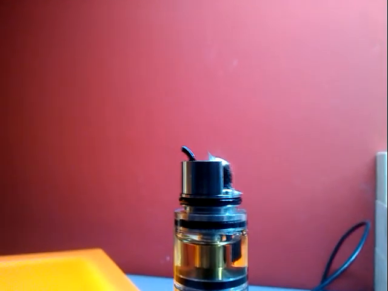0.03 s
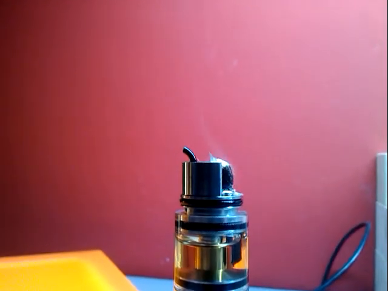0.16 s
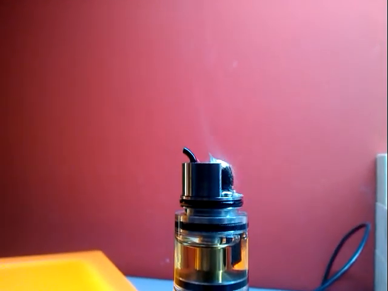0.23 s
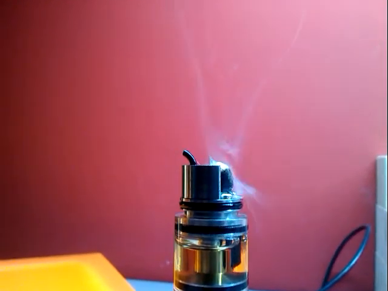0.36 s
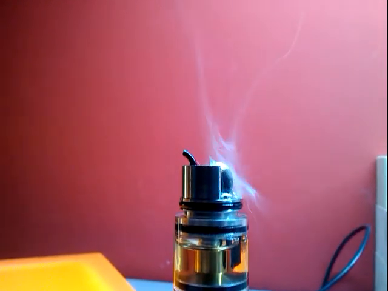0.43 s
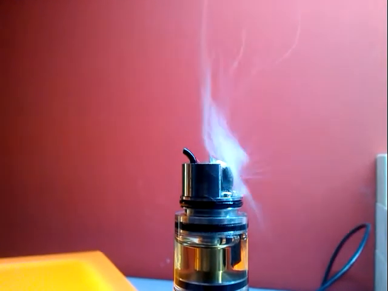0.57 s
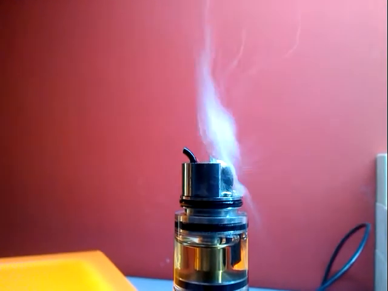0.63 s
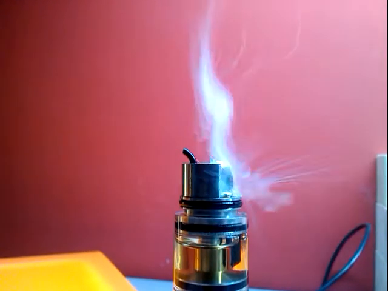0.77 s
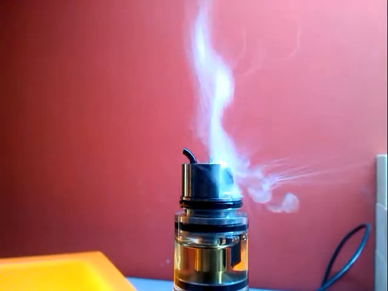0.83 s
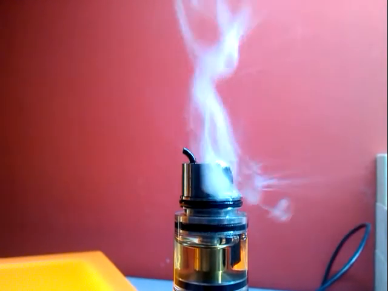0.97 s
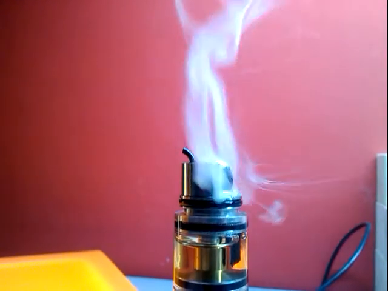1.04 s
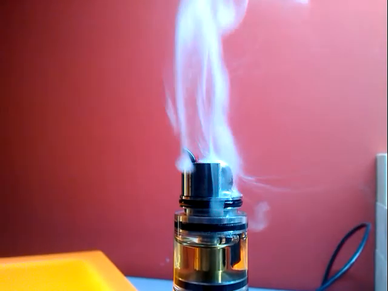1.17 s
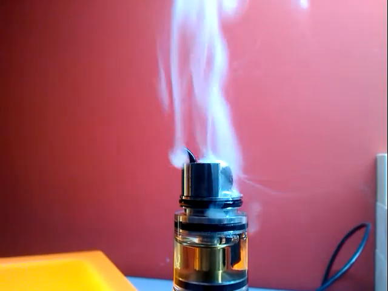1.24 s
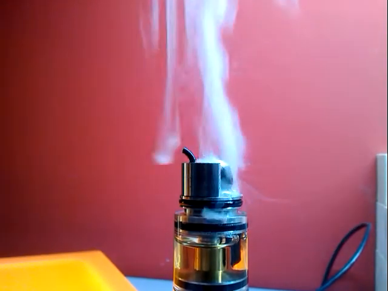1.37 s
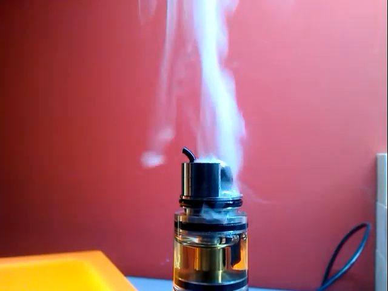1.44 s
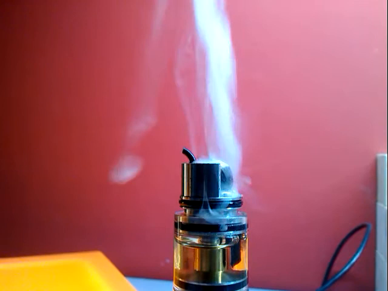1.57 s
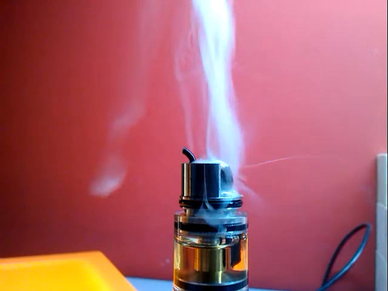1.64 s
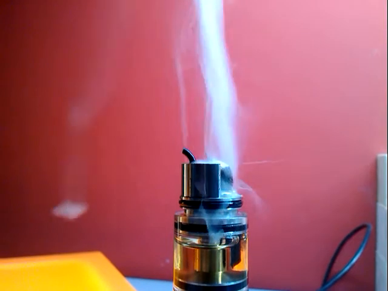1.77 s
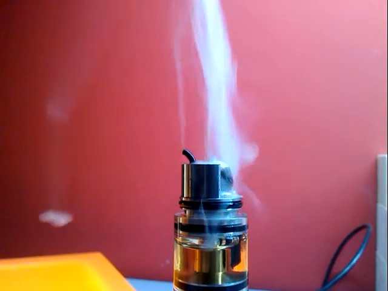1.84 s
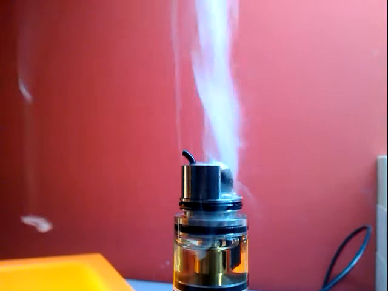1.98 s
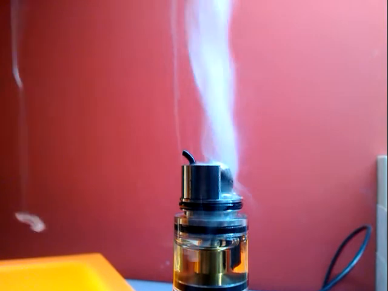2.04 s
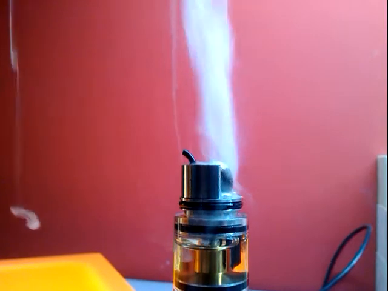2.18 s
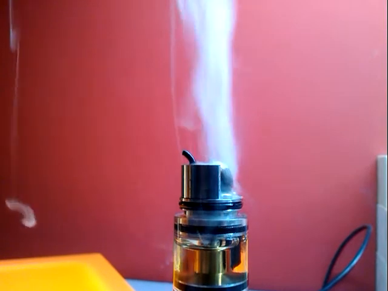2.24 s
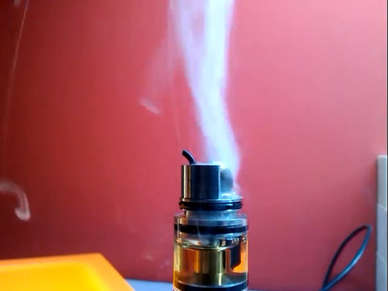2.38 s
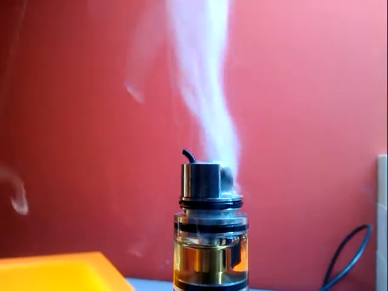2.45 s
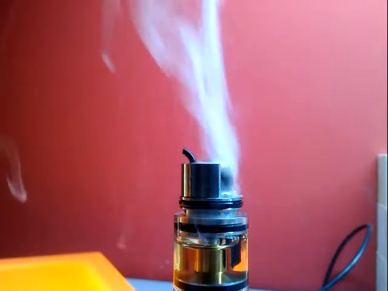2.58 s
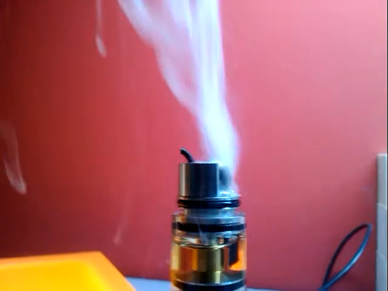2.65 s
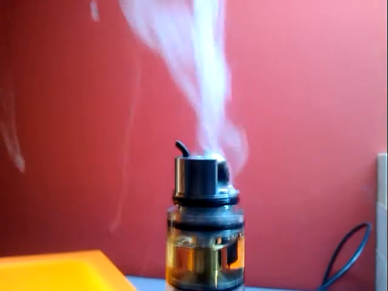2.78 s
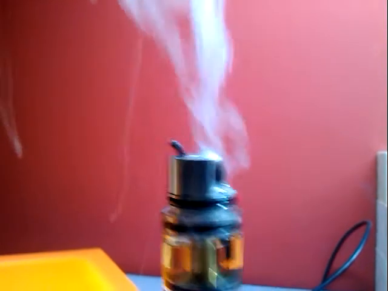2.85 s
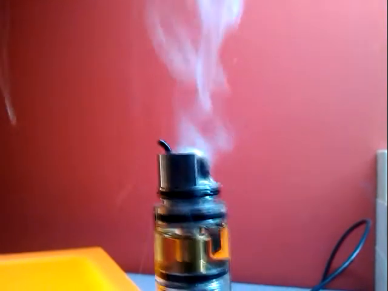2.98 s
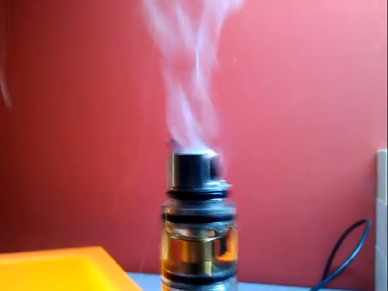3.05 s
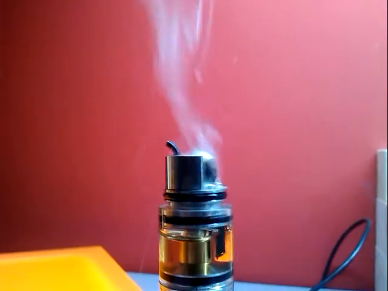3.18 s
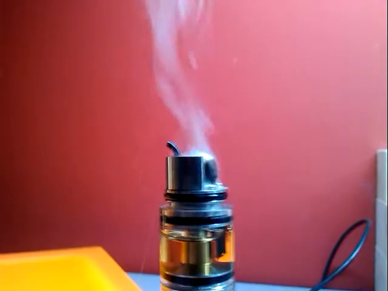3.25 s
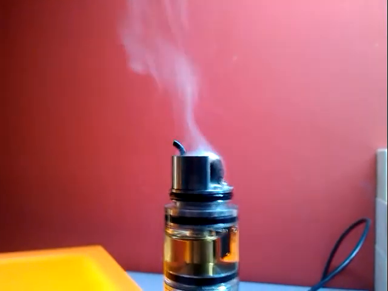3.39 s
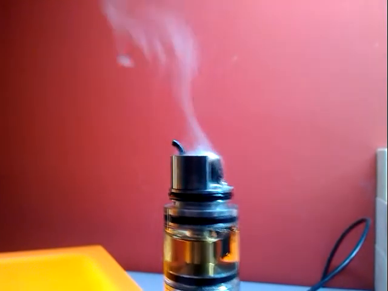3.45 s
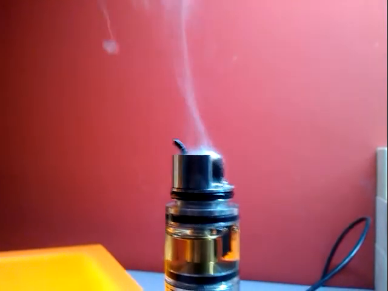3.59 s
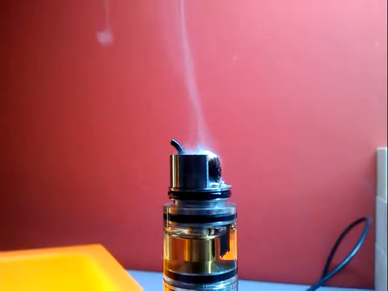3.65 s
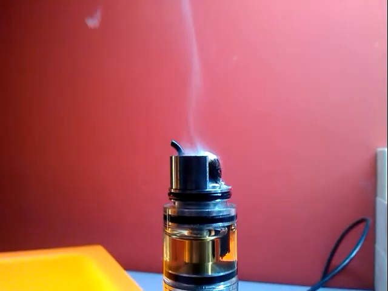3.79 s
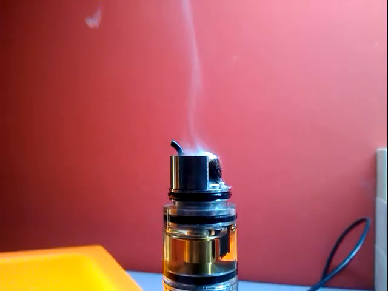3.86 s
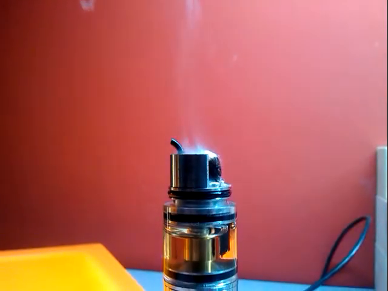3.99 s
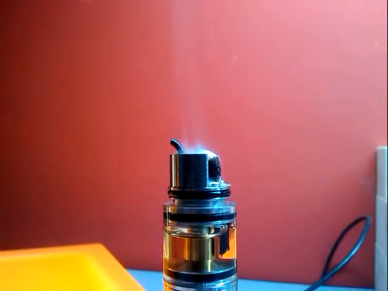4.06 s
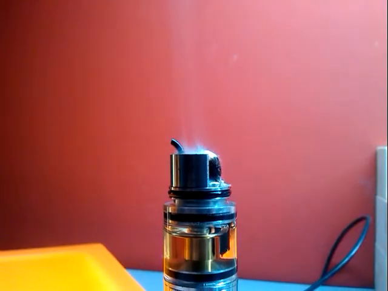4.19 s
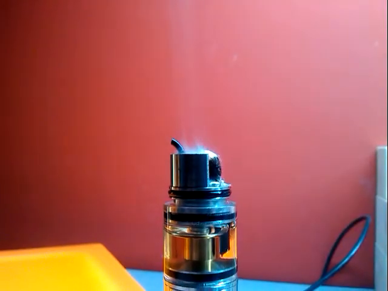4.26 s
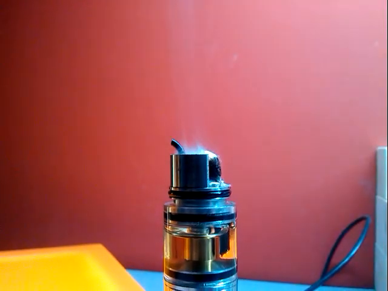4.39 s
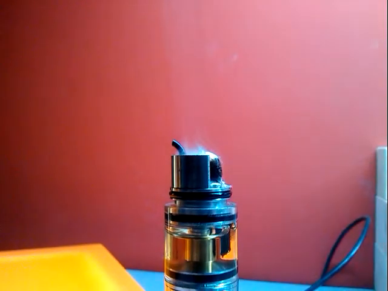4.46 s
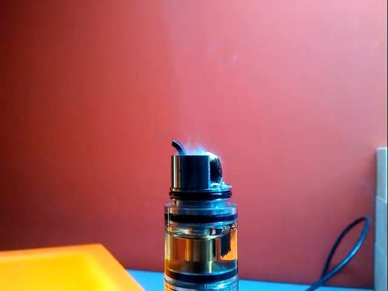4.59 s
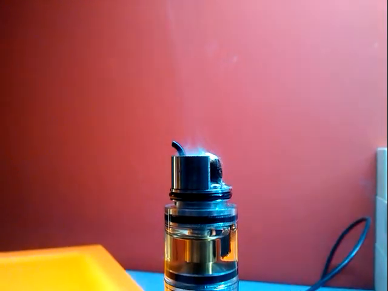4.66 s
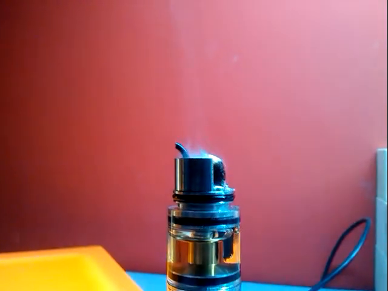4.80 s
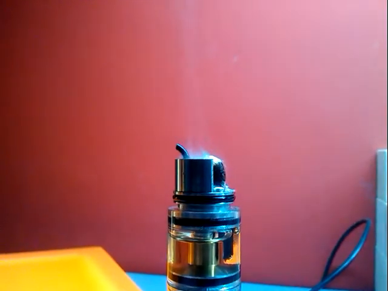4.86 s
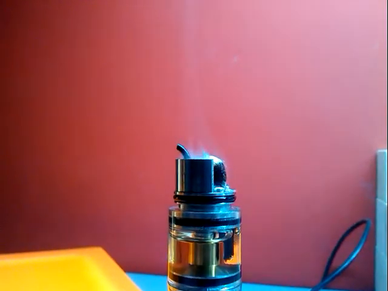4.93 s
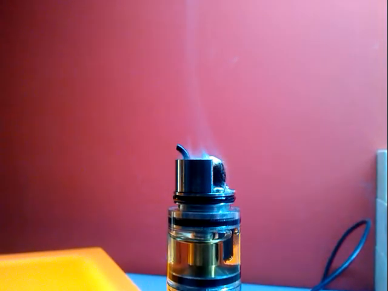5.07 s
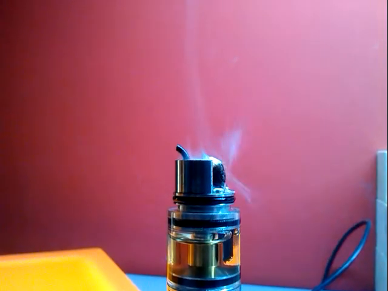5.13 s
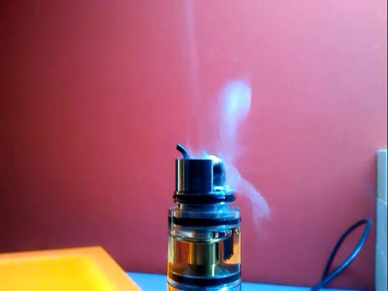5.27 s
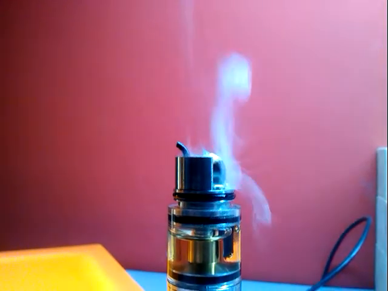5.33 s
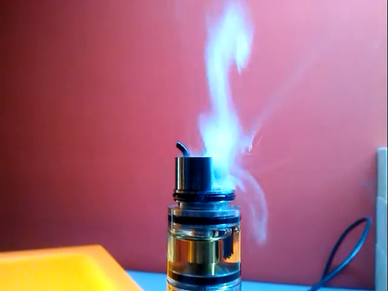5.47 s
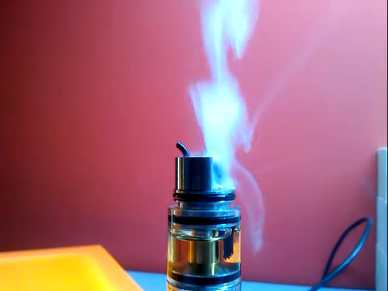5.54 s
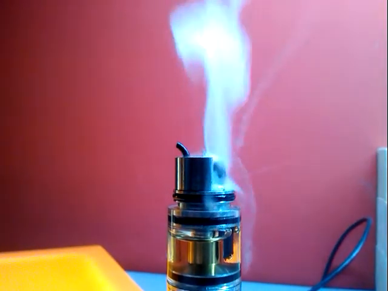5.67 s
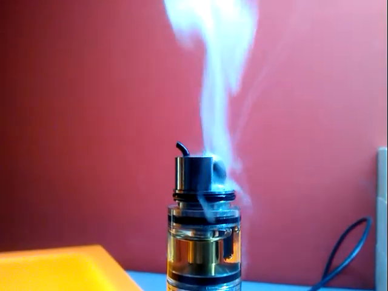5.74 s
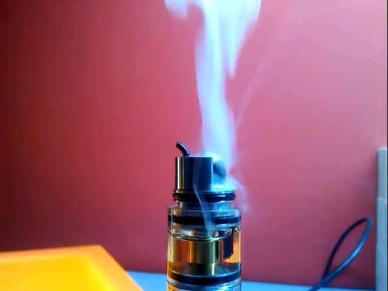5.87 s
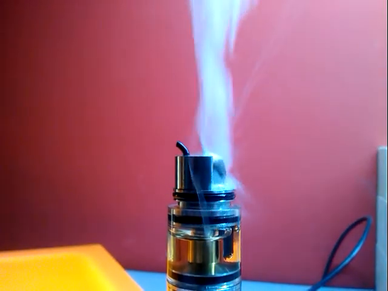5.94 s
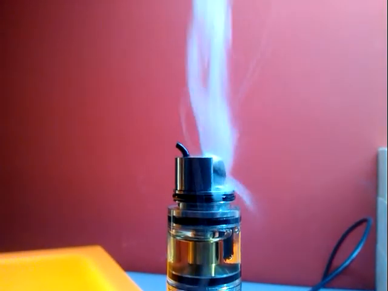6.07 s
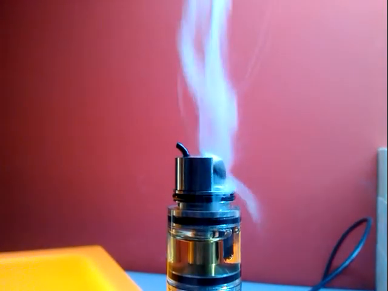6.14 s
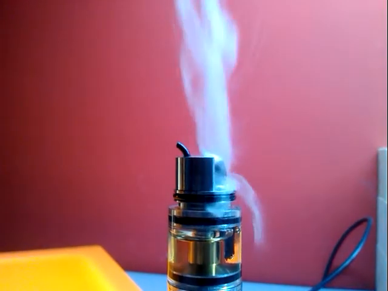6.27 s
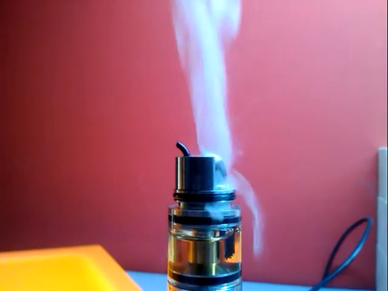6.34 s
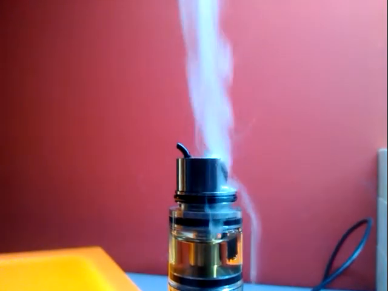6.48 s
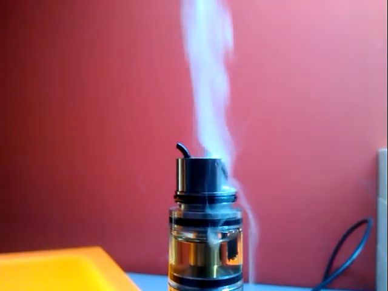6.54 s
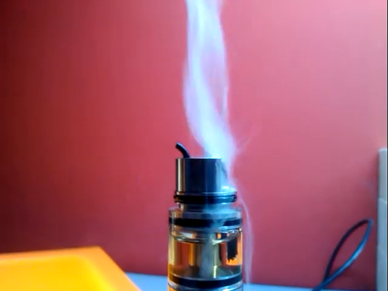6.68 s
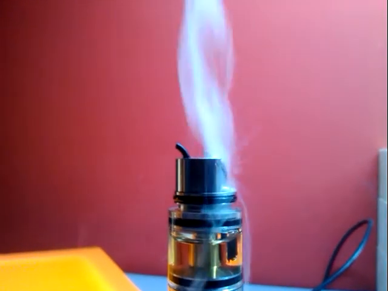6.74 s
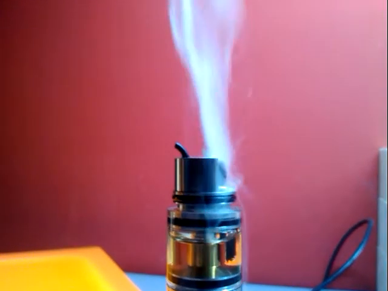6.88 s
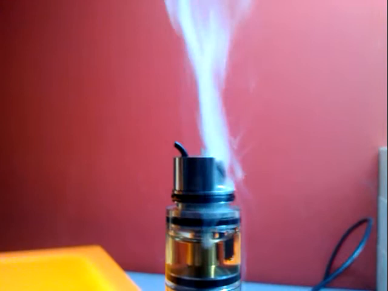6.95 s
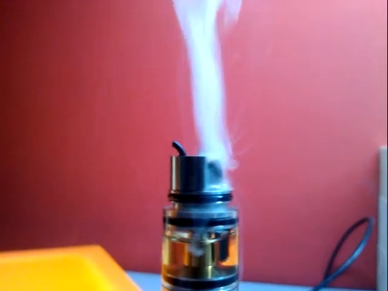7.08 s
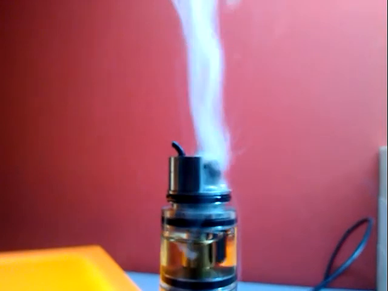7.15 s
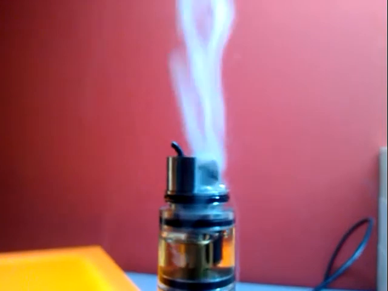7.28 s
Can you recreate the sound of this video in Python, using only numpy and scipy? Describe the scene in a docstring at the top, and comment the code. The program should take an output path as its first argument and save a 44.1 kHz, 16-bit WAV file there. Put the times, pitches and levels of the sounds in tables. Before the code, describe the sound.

Close to the microphone in a quiet room, a vaporizer coil starts sizzling almost at once, with one very loud sharp pop early on. The fine, bright frying slowly grows, then cuts to a fading fizz. Small clicks, cooling ticks and a firm knock on the table follow. A second, stronger sizzle opens with a brief buzz and snapping drops, flares at the end and dies away quickly.

```python
"""In a quiet room, close to a microphone, the coil of a small vaporizer is fired twice.
Tiny bubbles boiling at random on the wire make a dense sizzle; trapped drops burst in sharp pops.
The open metal cap colours both, and the second firing starts with a short buzz of regular bubbles.
The barely warm coil ticks, and the handled device clicks and knocks on the table as its case rings.
Shaped noise makes the low rumble, distant hum, soft room air and steady hiss behind it all."""
import sys
import numpy as np
from scipy import signal
from scipy.fft import rfft, irfft, next_fast_len
from scipy.io import wavfile
from scipy.ndimage import uniform_filter1d, map_coordinates

SR = 44100
rng = np.random.default_rng(int(sys.argv[2]) if len(sys.argv) > 2 else 0)


def transcribe(signal):
    """Save signal, clipped to [-1, 1], as a 16-bit WAV file at the path in sys.argv[1]."""
    frames = np.atleast_2d(signal).T
    limited = np.clip(frames, -1, 1)
    pcm = np.round(limited * 32767).astype(np.int16)
    wavfile.write(sys.argv[1], SR, pcm)


N = 322812

# single drops that burst clear of the sizzle:
# [t/s, push/dB before the shared pop gain and the cap, fatness 0-1]
DROPS = [(0.328, -27.5, 0.2), (0.387, -23.5, 0), (0.395, -23.5, 0), (0.449, -20.5, .5),
         (0.5545, -12.5, 0.4), (0.5773, -19, 0.7), (0.715, 3.5, 0.7), (0.7831, -13.5, 0.55),
         (0.7925, -19, 1), (1.3212, -14, 0.5), (5.0805, -21, .33), (5.239, -3, 0.4), (5.3168, -21.5, .2),
         (5.3444, -16, .1), (5.378, -19.5, 0.6), (5.4056, -6.5, 0.32), (6.3569, -15.5, 0.3),
         (6.367, -7.5, 0.16), (6.7035, -17, .4), (6.816, -21.5, .45), (6.8516, -24, 1),
         (7.2876, -18.5, .67)]
# each firing of the coil: [on/s, off/s, boiling at switch-on relative to full/dB, warm-up time constant/s,
# full boiling/dB, slow drift of the boiling while the coil is on, up or down/(dB per s)]
COIL_FIRINGS = [(.22, 2.652, -22.5, .15, -45.5, 1.57), (5.081, 7.4, -12, 0.09, -41.5, -0.4)]
# relative tone of one burst of vapour: [f/Hz, level/dB]
BURST_TONE = [(100, -31), (500, -31.5), (1400, -32), (1900, -21), (2900, -21), (4200, -10.5), (5600, -5),
              (6500, 2), (7600, -0.5), (8900, 0), (9600, -12), (10600, -14), (12500, -26), (15700, -28)]


def amp(db):
    """Turn decibels into a gain."""
    return 10 ** (np.asarray(db) / 20)


def unit(x):
    """Scale a sound to an average strength (rms) of 1."""
    return x / np.sqrt(np.mean(x ** 2) + 1e-20)


def along(points, hz):
    """Read a curve of (Hz, value) points, joined by straight lines on a log frequency axis."""
    f, v = np.transpose(points)
    return np.interp(np.log(hz + 1), np.log(f + 1), v)


def bumps(rows, hz):
    """Gain in dB of narrow peaks and notches, each given by centre, width and height."""
    return sum(db / (1 + (2 * (hz - centre) / width) ** 2) for centre, width, db in rows)


def wobble(rate):
    """A smooth random curve through `rate` random points a second."""
    knots = rng.standard_normal(int(N * rate / SR) + 4)
    return map_coordinates(knots, [np.arange(N) * rate / SR])


def coloured(x, gain_db):
    """Filter x to the given gain in dB at each frequency, with no sound before its cause."""
    m = 2 * next_fast_len(N // 2 + SR // 4)
    gain = amp(gain_db(np.fft.rfftfreq(m, 1 / SR)))
    # folding the cepstrum forward in time makes the filter respond only after its input
    cepstrum = irfft(np.log(gain), m)
    cepstrum[1:m // 2] *= 2
    cepstrum[m // 2 + 1:] = 0
    response = np.exp(rfft(cepstrum))
    return irfft(rfft(x, m) * response, m)[:N]


def add(track, s, sound):
    """Mix a sound into the track from time s."""
    part = track[round(s * SR):][:len(sound)]
    part += sound[:len(part)]


def patchy_noise(depth_db):
    """White noise whose narrow bands slowly swell and fade."""
    z = signal.stft(rng.standard_normal(N), nperseg=2048)[2]
    field = rng.standard_normal(z.shape)
    field = uniform_filter1d(field, size=5, axis=0)  # smooth across frequency
    field = uniform_filter1d(field, size=30, axis=1)  # smooth across time
    return signal.istft(z * amp(depth_db * unit(field)), nperseg=2048)[1][:N]


def background(rumble_trim_db=-1, hum_db=-70.5, hiss_db=-60.5):
    """Bands of noise: drifting rumble, distant swelling hum, soft room air, and hiss with a thin whine."""
    # relative tone of the room air: [f/Hz, level/dB]
    air_tone = [(20, -12), (38, 7), (140, 1.5), (255, -6), (340, -4), (480, -8), (600, -4), (780, -9.5),
                (1150, -7.5), (1850, -9.5), (2600, -17), (6000, -17.5), (9000, -23.5), (15700, -26.5)]
    # thin peaks in the hiss: [f/Hz, width/Hz, level/dB]
    whine_peaks = [(6304, 126, 14.5), (9400, 130, 7)]
    # drift of the rumble, before its trim: [t/s, level/dB]
    rumble_drift = [(0, -57.5), (1.0, -59), (2.3, -60), (2.6, -56.5), (2.9, -59), (4.9, -61), (6.0, -62.5),
                    (7.0, -57)]
    # swells of the hum: [centre t/s, half-length/s, level/dB]
    hum_swells = [(1.08, 0.35, -59), (1.6, .08, -59.5), (4.704, 0.13, -60)]
    air_start_db, air_fade_s, air_fade_db_per_s = -56, 5.15, 1.4  # holds steady, then slowly sinks
    t = np.arange(N) / SR

    def band(edges_hz, kind, patchy_db):
        """One frequency band of patchy noise, scaled to rms 1."""
        noise = coloured(patchy_noise(patchy_db), lambda hz: along(air_tone, hz) + bumps(whine_peaks, hz))
        band_filter = signal.butter(4, edges_hz, kind, fs=SR, output="sos")
        return unit(signal.sosfilt(band_filter, noise))

    rumble_db = np.interp(t, *np.transpose(rumble_drift)) + rumble_trim_db
    rumble = amp(rumble_db + 0.3 * wobble(8.1)) * band(212, "lowpass", patchy_db=1.0)
    swells = sum(amp(db) * np.exp(-((t - s) / length) ** 2) for s, length, db in hum_swells)
    hum = np.hypot(amp(hum_db), swells) * band([135, 168], "bandpass", patchy_db=0.5)
    air_db = air_start_db - air_fade_db_per_s * np.maximum(t - air_fade_s, 0)
    air = amp(air_db + 0.11 * wobble(8.7)) * band([230, 2500], "bandpass", patchy_db=2.2)
    hiss = amp(hiss_db) * band(2560, "highpass", patchy_db=1.4)
    return rumble + hum + air + hiss


def cap(x, tilt_db=0):
    """Bursts as they leave the ringing metal cap; tilt is in dB per octave of treble."""
    # resonances and cancellations of the cap: [f/Hz, width/Hz, gain/dB]
    cap_peaks = [(3360, 200, 5.5), (3880, 58, -13), (4610, 46, -11), (5104, 360, 5.5), (5290, 85, -6.5),
                 (5640, 170, -5.5), (6100, 120, -4.5), (6820, 170, 2.5), (6777, 73, -15.5), (6830, 300, 6),
                 (7450, 210, 3), (7970, 170, 6), (8030, 112, -23), (8220, 370, 3.5), (8620, 120, -5),
                 (9200, 87, -11), (9980, 230, -9), (10190, 170, 5.5), (11330, 460, -9.5), (12160, 390, 7),
                 (13450, 310, 10), (14100, 200, 7)]

    def gain_db(hz):
        tilt = tilt_db * np.log2(np.maximum(hz, 1800) / 7500)
        return along(BURST_TONE, hz) + bumps(cap_peaks, hz) + tilt

    return coloured(x, gain_db)


def boiling_level():
    """Strength of the boiling: it builds as the wire heats, dips after big pops and dies away in cooling."""
    cool_s, cool_db_per_decade, cold_after_s = 0.0074, 11, 1.2  # fades as a power of time, then stops
    flare_s, flare_db_per_s = 6.98, 12  # the last firing ends in ever fiercer boiling
    big_pop_db, dry_dip_db, rewet_s = -10, 1.5, 0.22  # pops listed above this blow liquid off the wire
    t = np.arange(N) / SR
    level = np.zeros(N)
    for on, off, cold_db, warm_s, full_db, drift_db in COIL_FIRINGS:
        heating = np.clip(t - on, 0, off - on)
        cooling = np.maximum(t - off, 0)
        db = full_db + cold_db * np.exp(-heating / warm_s) + drift_db * heating
        db = db - cool_db_per_decade * np.log10(1 + cooling / cool_s)
        level += (t > on) * np.exp(-(cooling / cold_after_s) ** 2) * amp(db)
    dry_wire = sum((t > s) * np.exp(-np.abs(t - s) / rewet_s) for s, db, _ in DROPS if db > big_pop_db)
    flare_db = flare_db_per_s * np.maximum(t - flare_s, 0)
    return level * amp(flare_db - dry_dip_db * dry_wire)


def sizzle(rate=1500, spread_db=2.5, steam_db=-2, flutter_db=0.1, crowding=1.1, sparsest=.06):
    """Countless tiny bubbles burst at random over hissing steam; weak boiling is sparser and grainier."""
    level = boiling_level()
    density = np.clip(unit(level) ** crowding, sparsest, 1)
    sizes = amp(spread_db * np.minimum(rng.standard_normal(N), 2.5)) * rng.choice([-1, 1], N)
    bursts = rng.random(N) < density * rate / SR  # up to `rate` bubbles a second
    bubbles = unit(sizes * bursts / np.sqrt(density))  # fewer bubbles are each made stronger
    steam = amp(steam_db) * rng.standard_normal(N)
    return level * amp(flutter_db * wobble(45)) * unit(cap(bubbles + steam))


def ticks(fatness=.3):
    """Ticks of the barely warm coil, each made like a small pop: rows (s, push dB, fatness)."""
    # [t/s, push/dB before the shared pop gain and the cap]
    coil_ticks = [(0.2263, -29.5), (0.2753, -32.5), (2.7774, -32.5), (2.8195, -32), (2.8552, -34),
                  (2.917, -31.5), (2.9921, -32.5), (4.6152, -31.5), (4.8763, -36), (4.8912, -30.5),
                  (4.9417, -35)]
    return [(s, db, fatness) for s, db in coil_ticks]


def spits(count=200, per_s=9, over_boiling_db=14, spread_db=2, fatness=.2):
    """Small drops spit at random during firings, following the boiling: rows (s, push dB, fatness)."""
    level = boiling_level()
    chance = rng.random((count, 2))
    times = np.cumsum(-np.log(1 - chance[:, 0])) / per_s  # random gaps
    sizes_db = over_boiling_db + spread_db * (2 * chance[:, 1] - 1)
    rows = []
    for s, db in zip(times, sizes_db):
        if s < N / SR and any(on < s < off for on, off, *_ in COIL_FIRINGS):
            boiling_db = 20 * np.log10(level[int(s * SR)] + 1e-9)
            rows.append((s, boiling_db + db, fatness))
    return rows


def room(sound, rise=0.0035):
    """The diffuse tail that the room gives a short sound: noise that fades at its own pace in each band."""
    # time to fade by 60 dB: [f/Hz, fade/s]
    fade_times = [(150, 1), (500, 0.24), (2500, 0.4), (7000, 0.69), (14000, 0.16)]
    hz, t, z = signal.stft(rng.standard_normal(SR // 2), SR, nperseg=256)
    fade = amp(-60 * t / along(fade_times, hz)[:, None])
    tail = signal.istft(z * fade * (1 - np.exp(-t / rise)), SR, nperseg=256)[1]
    return signal.fftconvolve(sound, tail / np.linalg.norm(tail))


def pops(gain_db=14, scatter_db=-7, scatter_t60=0.021, wet_db=-16.5, wet_tilt_db=-7.0,
         bright_tilt_db=2.0, dull_tilt_db=-5):
    """A drop bursts in one push, which rattles briefly between cap, case and table; fat drops sound duller."""
    bright, dull, echo = np.zeros((3, N))
    t = np.arange(SR // 30) / SR
    for s, db, fatness in [*DROPS, *ticks(), *spits()]:
        scatter = rng.standard_normal(len(t)) * amp(-60 * t / scatter_t60) * (1 - np.exp(-t / 0.00092))
        scatter = amp(scatter_db) * scatter / np.linalg.norm(scatter)
        push = amp(db + gain_db) * ((t == 0) + scatter)  # a single-sample push, then the rattle
        fatness = np.clip(fatness, 0, 1)
        arrival = s + .001
        add(bright, arrival, (1 - fatness) * push)
        add(dull, arrival, fatness * push)
        add(echo, arrival, amp(wet_db) * room(push))

    def answer_db(hz):
        """The treble beams at the microphone, so the room answers in a darker tone."""
        return along(BURST_TONE, hz) + wet_tilt_db * np.log2(np.maximum(hz, 2500) / 7500)

    return cap(bright, bright_tilt_db) + cap(dull, dull_tilt_db) + coloured(echo, answer_db)


def handling(crack_db=-5, crack_t60=0.052, ring_wet_db=-8, crack_wet_db=0, beam_hz=1500,
             crack_hz=(400, 3200)):
    """Soft bumps stir low modes of case and table; hard clicks stir high ones and add a noisy crack."""
    # handling of the device, as drive to the modes: [t/s, table boom/dB, knock/dB, click/dB]
    hits = [(2.6883, -52, -35, -41.5), (2.6993, -69, -44, -42.5), (2.7709, -59, -43.5, -46.5),
            (3.0775, -64, -39, -27.5), (4.412, -42, -55, -61), (4.7574, -33, -19.5, -31)]
    # ringing modes of the case standing on the table: [f/Hz, relative level/dB, time to fade by 60 dB/s]
    case_modes = [(103, 0.5, .1), (183.4, -8.5, 0.18), (252, -8, 0.079), (368, 1.5, 0.031),
                  (438, -0.5, 0.054), (530, -5.5, 0.052), (614, 3, 0.044), (892, -5, 0.028),
                  (1103, 0.5, 0.012), (1822, 2, 0.045), (2340, 3, .016), (2570, -0.5, 0.024),
                  (2840, -2.5, 0.0081), (3640, -3, 0.0096), (4600, -2.5, 0.0082), (6500, -2, 0.0058)]
    rebound_s, rebound_db = .0041, -8  # every knock lands a second time, more softly
    track, t = np.zeros(N), np.arange(SR // 4) / SR
    crack_filter = signal.butter(2, crack_hz, "bandpass", fs=SR)
    rebounds = np.array(hits) + [rebound_s, rebound_db, rebound_db, rebound_db]
    for s, boom_db, knock_db, click_db in np.vstack([hits, rebounds]):
        force = [(150, boom_db), (430, knock_db), (650, knock_db), (1800, click_db)]
        ring = np.zeros(len(t))
        for k, (hz, db, t60) in enumerate(case_modes):
            mode_db = db + along(force, hz) + rng.normal(0, 1)  # no two hits stir a mode alike
            ring += (-1) ** k * amp(mode_db - 60 * t / t60) * np.sin(2 * np.pi * hz * t)
        crack = signal.lfilter(*crack_filter, rng.standard_normal(len(t)))
        crack *= amp(click_db + crack_db - 60 * t / crack_t60)
        spread = signal.lfilter(*signal.butter(1, beam_hz, fs=SR), ring)  # low modes radiate all round
        add(track, s, ring + crack)
        add(track, s, room(amp(ring_wet_db) * spread + amp(crack_wet_db) * crack))
    # so small a body radiates no deep bass
    return signal.lfilter(*signal.butter(2, 75, "highpass", fs=SR), track)


def sputter(jitter=.03, spread_db=1.0):
    """One spot on the warm coil sheds a regular train of bubbles: a buzz that speeds up and fades."""
    start_s, hold_s, hold_db, fade_db_per_s = 5.085, 0.067, -49, 127
    start_hz, end_hz, rise_s = 309, 402, .025  # bubbles a second, and how quickly the pace rises
    age = np.maximum(np.arange(N) / SR - start_s, 0)
    rate = end_hz + (start_hz - end_hz) * np.exp(-age / rise_s)
    db = hold_db - fade_db_per_s * np.maximum(age - hold_s, 0)
    cycles = np.cumsum(rate * (1 + jitter * wobble(300))) / SR
    # one bubble each time a cycle is completed
    bubbles = np.diff(np.floor(cycles), prepend=0) * amp(spread_db * rng.standard_normal(N))
    return unit(cap(bubbles)) * amp(db) * (age > 0)


def scene():
    """All sources add up at one microphone."""
    return (background() + sizzle() + pops() + handling() + sputter())[None]


def record(dry, top_hz=15780):
    """The recorder rounds off the loudest peaks and keeps nothing above its band limit."""
    rounded = dry / (1 + (dry / .8) ** 4) ** (1 / 4)
    m = next_fast_len(N + SR // 2)
    kept = np.fft.rfftfreq(m, 1 / SR) < top_hz
    return irfft(rfft(rounded, m) * kept, m)[..., :N]


dry = scene()
out = record(dry)
transcribe(out)
```